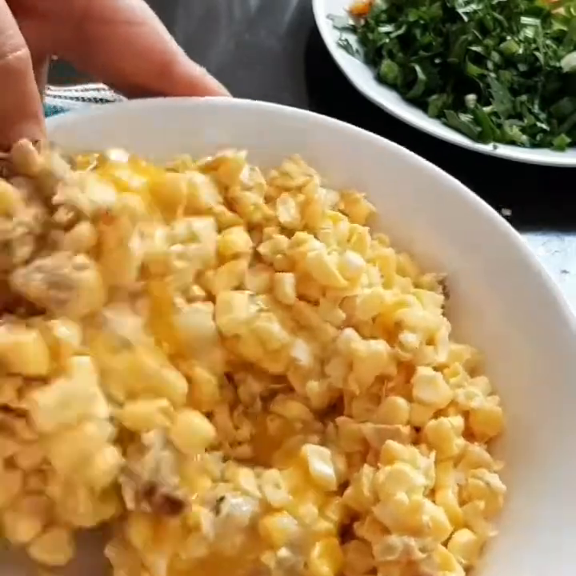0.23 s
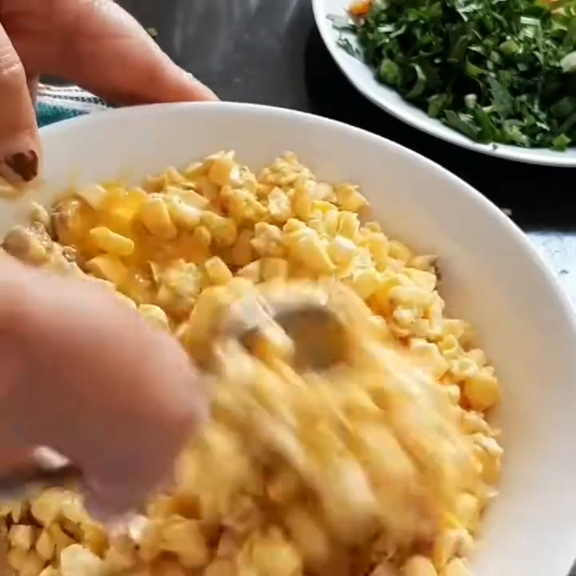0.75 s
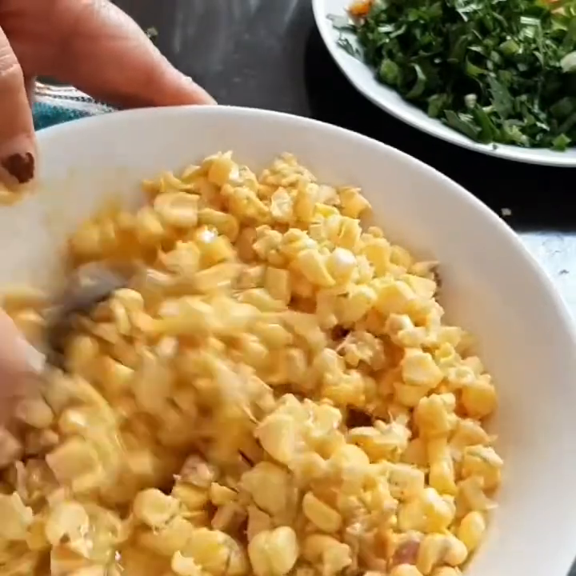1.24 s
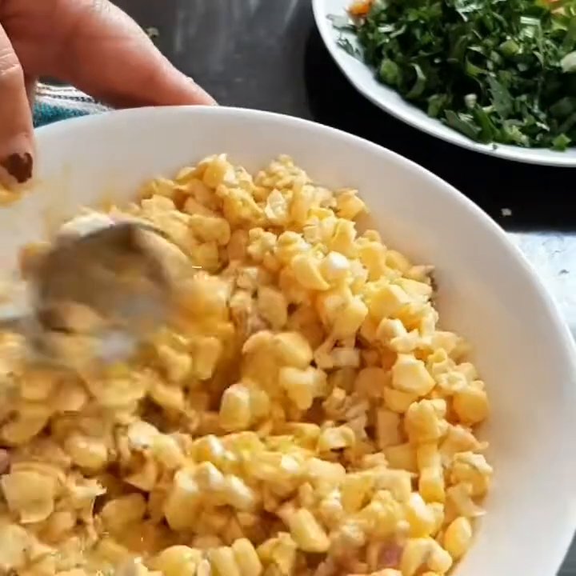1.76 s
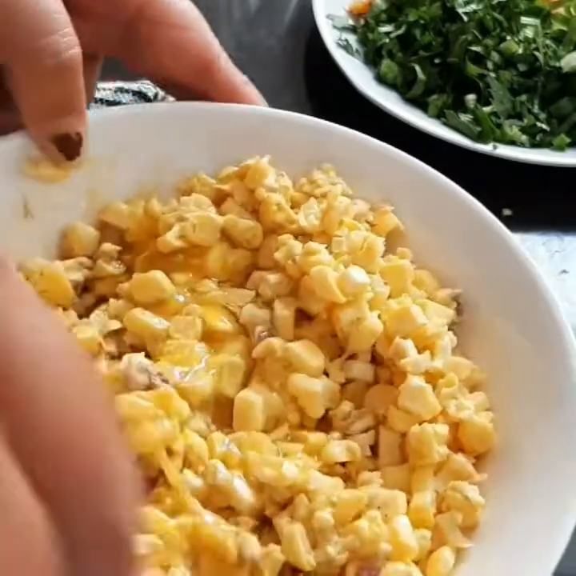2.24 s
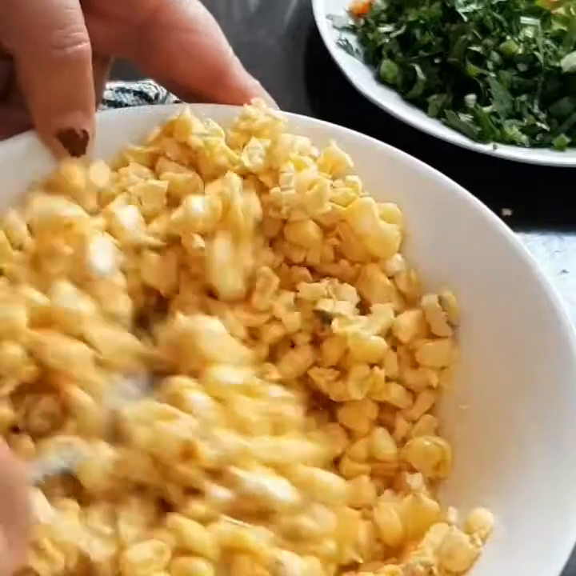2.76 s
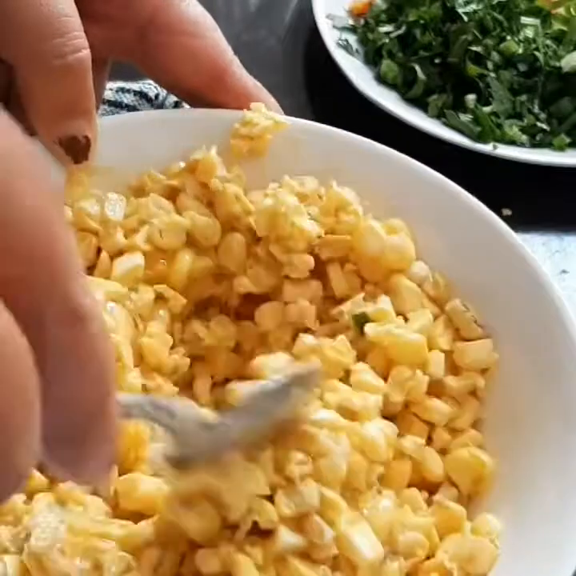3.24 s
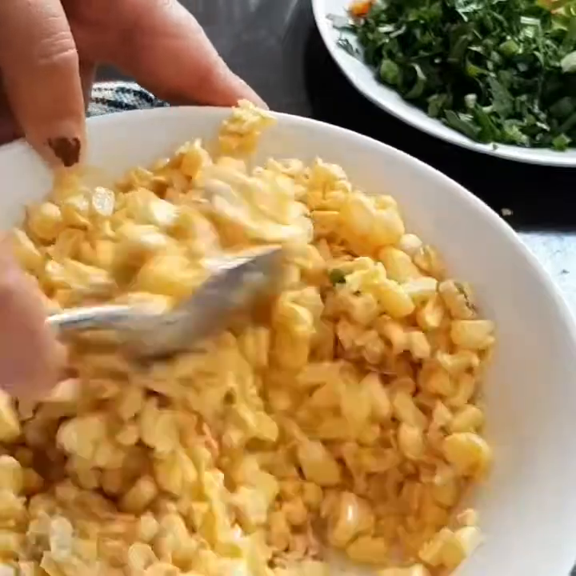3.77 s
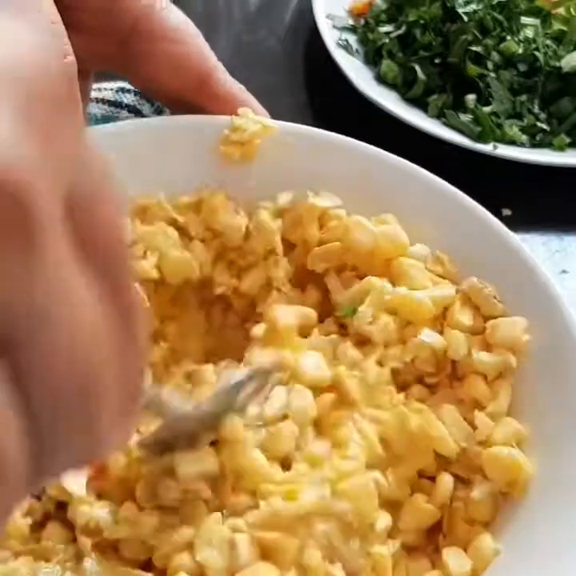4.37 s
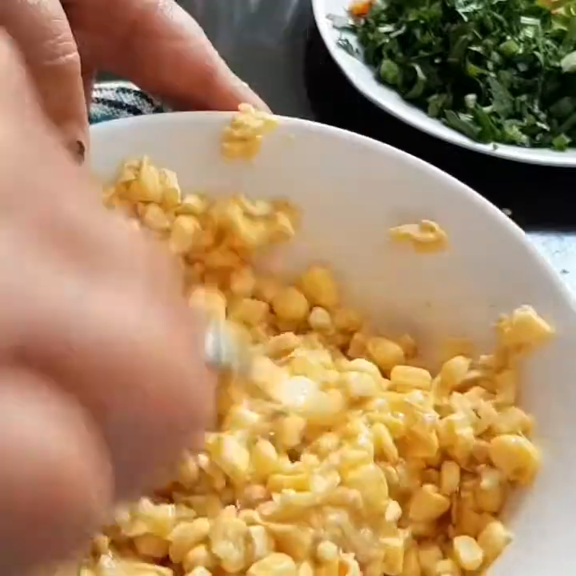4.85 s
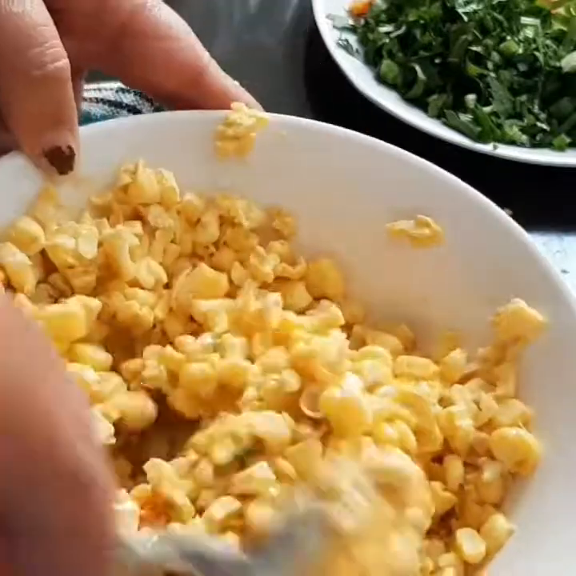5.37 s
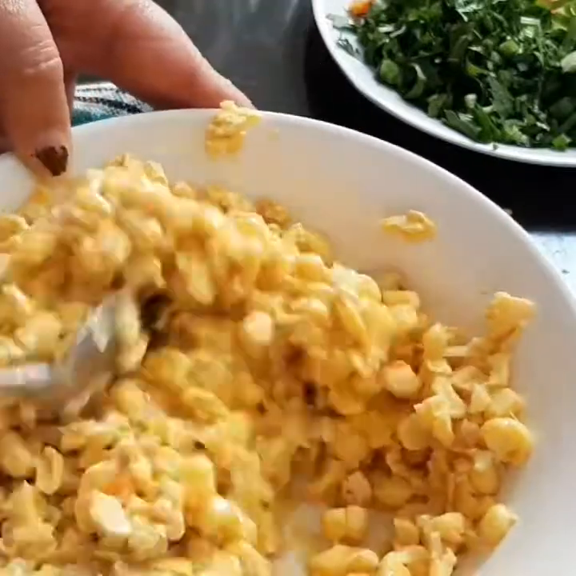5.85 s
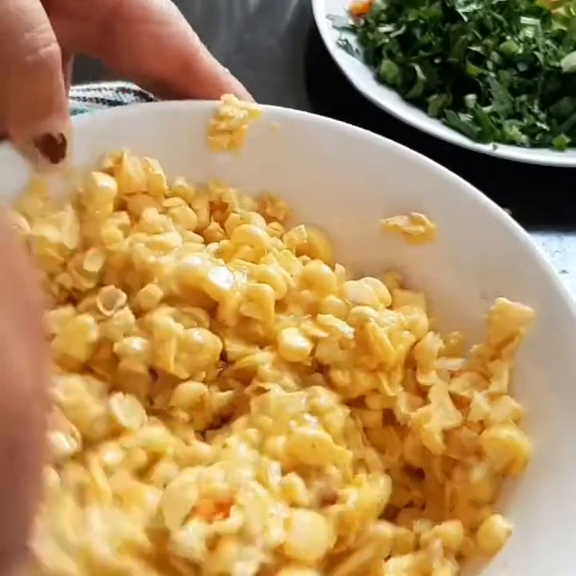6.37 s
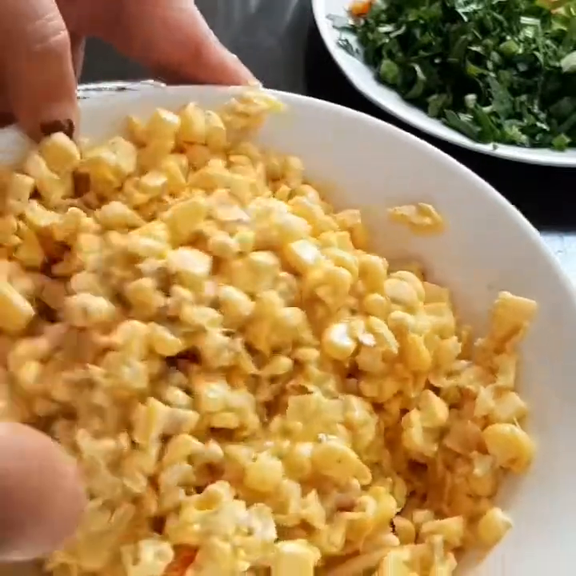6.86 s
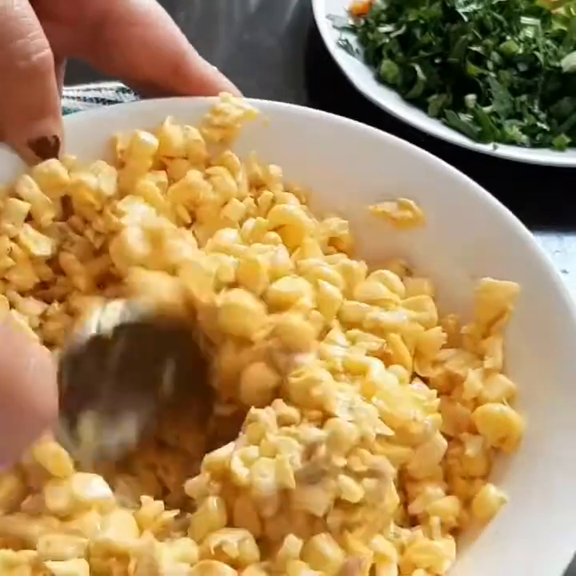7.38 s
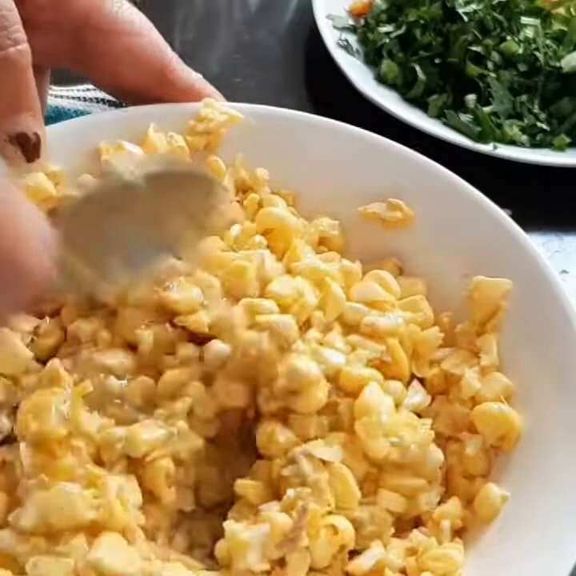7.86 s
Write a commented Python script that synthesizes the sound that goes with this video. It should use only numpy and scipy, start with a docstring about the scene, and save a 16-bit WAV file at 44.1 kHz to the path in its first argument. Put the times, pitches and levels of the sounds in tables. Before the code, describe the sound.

Close stereo pickup in a hard-walled kitchen: a metal spoon stirs wet, sticky corn in irregular squelching, crackling strokes. After an early clink come soft knocks, then a scrape and clink just before four seconds, a heavier cluster near four and a third, and the loudest clink around five and a half. A faint low appliance hum continues beneath. The sound fades away after six seconds and cuts back in with crackly stirring.

```python
"""In a hard-walled kitchen, a metal spoon stirs a wet corn mixture in a ceramic bowl, heard close by.
Each stroke sets off swarms of bursting bubbles (the squelch) and rings the hollow behind the spoon.
Filtered impulses make dull knocks through the food; damped modes and noise make clinks and scrapes on glaze.
Steady tones and coloured noise make an appliance's hum, and sparse decaying taps make the echo.
Near the end the sound fades out, and the stirring cuts in again."""
import sys
import numpy as np
from scipy import signal
from scipy.fft import rfft, irfft
from scipy.io import wavfile
from scipy.ndimage import uniform_filter1d

SR = 44100
rng = np.random.default_rng(int(sys.argv[2]) if len(sys.argv) > 2 else 0)


def generate_wav(signal):
    """Clip the signal to [-1, 1] and save it as 16-bit WAV at the path in sys.argv[1]."""
    frames = np.transpose(np.atleast_2d(signal))
    scaled = np.clip(frames, -1, 1) * 32767
    pcm = np.round(scaled).astype(np.int16)
    wavfile.write(sys.argv[1], SR, pcm)


N = 357645
TIME = np.arange(N) / SR  # s


def amp(db):
    """Level: converts decibels to an amplitude ratio."""
    return 10 ** (np.asarray(db) / 20)


def unit(x):
    """Normalisation: scales a signal to an rms of one."""
    return x / np.sqrt(np.mean(x ** 2) + 1e-20)


def read(points, hz):
    """Logarithmic pitch: interpolates a table along a log-frequency axis."""
    f, value = np.transpose(points)
    return np.interp(np.log(hz + 1), np.log(f), value)


def add(mix, s, sound):
    """Superposition: adds a sound to the mix in place, from time s."""
    part = mix[:, max(round(s * SR), 0):][:, :sound.shape[-1]]
    part += sound[..., :part.shape[1]]


def colour(x, points):
    """Spectral shaping: weights a signal by a spectrum table, at an rms of one."""
    gain = amp(read(points, np.fft.rfftfreq(N, 1 / SR)))
    return unit(irfft(rfft(x) * gain, N))


def drift(hz):
    """Low-pass noise: slow random variation up to about hz, with an rms of one."""
    f = np.fft.rfftfreq(N, 1 / SR)
    return unit(irfft(rfft(rng.standard_normal(N)) / (1 + (f / hz) ** 4), N))


def clicks(per_s, spread_db):
    """Poisson-like impulses: random snaps of either sign, most small and a few large."""
    size = amp(spread_db * np.minimum(rng.exponential(1, N), 4))
    sign = rng.choice([-1, 1], N)
    return size * sign * (rng.random(N) < per_s / SR)


def ring(hz, t60, t):
    """Damped oscillation: one mode that decays by 60 dB in t60 seconds."""
    return np.sin(2 * np.pi * hz * t) * np.exp(-np.log(1000) * t / t60)


def receivers(sound):
    """Arrival-time difference: each of two receivers hears a sound after its own few samples of lag."""
    lags = rng.integers(0, 12, 2)
    return np.array([np.pad(sound, (lag, 0))[:len(sound)] for lag in lags])


# left-right correlation of a diffuse sound: (f/Hz, correlation)
LEFT_RIGHT_CORRELATION = [(30, 0.42), (80, 0.79), (200, 0.75), (350, 0.69), (550, -0.24), (1000, -0.33),
                          (2000, -0.21), (16000, -0.1)]


def correlate_pair(z, hz):
    """Diffuse-field coherence: mixes two independent spectra until they are as alike as at two receivers."""
    same = np.clip(read(LEFT_RIGHT_CORRELATION, hz), -1, 1)
    return np.array([z[0], same * z[0] + np.sqrt(1 - same ** 2) * z[1]])


# tones of the appliance: (f/Hz, rms level/dB)
HUM_TONES = [(196, -56.5), (140.26, -77), (298, -81), (483.8, -85), (1450, -92.5), (3774, -98), (5389, -94)]
# spectrum of the room's soft rush: (f/Hz, relative level/dB per Hz)
KITCHEN_SPECTRUM = [(25, -20.5), (50, -5.5), (80, -2), (110, -3.5), (150, 3), (230, 0), (330, -4),
                    (500, -9.5), (800, -19.5), (1600, -20.5), (2600, -35.5), (5000, -27.5), (9000, -35),
                    (16000, -26.5)]
KITCHEN_DB = -66.5  # rms level of the rush


def appliance(waver_db=1.0):
    """Forced vibration: a motor's slightly unsteady tones over the soft rush of the room."""
    noise = rfft(rng.standard_normal((2, N)))
    air = irfft(correlate_pair(noise, np.fft.rfftfreq(N, 1 / SR)), N)
    # one wandering clock bends every tone in proportion to its pitch
    clock = TIME + .15 * drift(hz=2) / (2 * np.pi * HUM_TONES[0][0])
    tones = sum(amp(db) * np.sqrt(2) * np.sin(2 * np.pi * (hz * clock + rng.random()))
                for hz, db in HUM_TONES)
    return tones * amp(waver_db * drift(hz=8.5)) + amp(KITCHEN_DB) * colour(air, KITCHEN_SPECTRUM)


STROKE_DEPTH_DB = 25  # a stroke swells by this much over its rise and sinks by as much over its release


def push(peak_s, rise_s, release_s):
    """Exponential envelope: a stroke's force builds to the hardest push and lets go."""
    away = np.maximum((peak_s - TIME) / rise_s, (TIME - peak_s) / release_s)
    return amp(-STROKE_DEPTH_DB * away)


HOLLOW_Q, HOLLOW_RISE_OCTAVES_PER_S = 7.8, .5


def hollow(hz, peak_s):
    """Cavity resonance: bursting films ring the pocket behind the spoon; its pitch climbs as it closes."""
    pitch = hz * 2 ** (HOLLOW_RISE_OCTAVES_PER_S * np.clip(TIME - peak_s, -.5, .5))
    turn = np.exp(2j * np.pi * np.cumsum(pitch) / SR)
    r = np.exp(-np.pi * hz / HOLLOW_Q / SR)
    bursts = clicks(per_s=1500, spread_db=2.5) + 1e-12  # never exactly silent
    return unit((turn * signal.lfilter([1 - r], [1, -r], bursts)).real)


def bubble(hz, cycles):
    """Transient oscillation: a bursting film sounds a few cycles under an envelope that peaks at one."""
    turns = hz * np.arange(SR // 80) / SR
    u = turns / cycles
    return u * np.exp(1 - u) * np.sin(2 * np.pi * turns)


def grains(points, per_s, cycles, count=22):
    """Random superposition: bubbles burst in clumps; each size comes and goes, in its own place."""
    out = np.zeros((2, N))
    clumps = amp(2.8 * drift(hz=70))
    for hz in np.geomspace(350, 13500, count):
        grain = bubble(hz * rng.uniform(.94, 1.06), cycles) * hz
        share = amp(3 * np.interp(TIME, np.linspace(0, N / SR, 200), rng.standard_normal(200)))
        bursts = clumps * share * clicks(per_s / count, 3.5)
        out += receivers(signal.oaconvolve(bursts, grain)[:N])
    return colour(out, points)


# the lesser bubbles: rate, centre level against the crackle force, scatter either way, pitch range
SMALL_POPS_PER_S, SMALL_POP_DB, SMALL_POP_SPREAD_DB = 14, 12, 5
SMALL_POP_LOW_HZ, SMALL_POP_HIGH_HZ = 2025, 10000


def small_pops(crackle, count=300):
    """Poisson process: lesser bubbles burst at random, louder where the spoon works harder."""
    wait, size, pitch = rng.random((count, 3)).T
    s = np.cumsum(-np.log(1 - wait)) / SMALL_POPS_PER_S
    db = 20 * np.log10(np.interp(s, TIME, crackle)) + SMALL_POP_DB + SMALL_POP_SPREAD_DB * (2 * size - 1)
    hz = SMALL_POP_LOW_HZ * (SMALL_POP_HIGH_HZ / SMALL_POP_LOW_HZ) ** pitch
    return [row for row in zip(s, db, hz) if row[0] < TIME[-1]]


# strokes of the spoon through the food: (t/s of the hardest push, rise t/s, release t/s,
# relative crackle level/dB, relative squelch level/dB, hollow f/Hz)
SPOON_STROKES = [(0.478, 0.13, .07, -63.5, -68, 2720), (0.78, 0.062, 0.088, -56.5, -56, 2000),
                 (1.1, 0.095, 0.12, -71.5, -65, 1570), (1.5, 0.16, 0.37, -63, -76, 3540),
                 (1.952, 0.055, .07, -64, -61.5, 2050), (2.279, 0.05, 0.13, -61, -64, 2680),
                 (2.48, 0.049, 0.17, -54, -57, 2410), (2.762, 0.26, 0.1, -62.5, -76, 3020),
                 (3.099, 0.18, 0.11, -63.5, -67.5, 1590), (3.43, 0.11, .14, -63.5, -64.5, 2260),
                 (4.34, 0.15, 0.58, -70.5, -62.5, 2700), (4.7, 0.11, 0.18, -60, -63.5, 4320),
                 (5.082, 0.14, 0.28, -65, -62.5, 2133), (6.47, 0.23, 0.11, -64, -68, 3467),
                 (6.78, 0.085, 0.04, -56.5, -55, 3200), (7.33, 0.16, .08, -59, -66, 4253),
                 (7.57, 0.051, 0.24, -62, -86, 6930), (7.87, 0.46, 0.22, -66, -85, 3700),
                 (8.1, 0.22, 0.11, -55, -81, 6500)]
# the largest sticky bubbles that burst: (t/s, relative level/dB, f/Hz)
LARGE_POPS = [(0.761, -45.5, 3100), (1.531, -38, 7100), (1.93, -48, 2230), (1.961, -42, 2030),
              (2.631, -41.5, 2080), (4.529, -41.5, 11500), (4.686, -35, 4490), (5.179, -45.5, 4930),
              (6.797, -43, 8270), (7.565, -42, 6900), (7.599, -38, 10100), (7.825, -38.5, 3820)]
# spectra of the fine crackle and the low squelch: (f/Hz, relative level/dB per Hz)
CRACKLE_SPECTRUM = [(1500, -33), (3000, 1.5), (4000, 5), (6500, 4.5), (9500, -4.5), (13000, 4),
                    (16000, -10)]
SQUELCH_SPECTRUM = [(200, -1), (450, 2.5), (900, -2.5), (1500, 4), (2000, 5.5), (2400, -4.5), (3500, -15.5),
                    (6000, -18), (12000, -35.5)]
SETTLE_CRACKLE_DB, SETTLE_SQUELCH_DB = -86.5, -94.5  # the food settling, on the strokes' scale
HOLLOW_DB = -11  # the hollow's ring against the stroke


def food(crackle_db=-3, squelch_db=1, pops_db=3, snap_db=-9, snap_s=0.0011):
    """Bubble acoustics: parting kernels crackle; larger air pockets squelch and ring; films snap."""
    crackle, squelch = amp(SETTLE_CRACKLE_DB), amp(SETTLE_SQUELCH_DB)
    out = np.zeros((2, N))
    for s, rise_s, release_s, wet_db, low_db, hz in SPOON_STROKES:
        force = push(s, rise_s, release_s)
        crackle = crackle + amp(wet_db) * force
        squelch = squelch + amp(low_db) * force
        out += amp(HOLLOW_DB) * (amp(wet_db) + amp(low_db)) * force * receivers(hollow(hz, s))
    out += amp(crackle_db) * crackle * grains(CRACKLE_SPECTRUM, per_s=7000, cycles=0.7)
    out += amp(squelch_db) * squelch * grains(SQUELCH_SPECTRUM, per_s=4100, cycles=1)
    t = np.arange(SR // 80) / SR
    for s, db, hz in LARGE_POPS + small_pops(crackle):
        snap = amp(snap_db) * rng.standard_normal(len(t)) * np.exp(-t / snap_s)
        pop = bubble(hz, cycles=1.1) / 2 + snap
        add(out, s - snap_s / 2, amp(db + pops_db) * receivers(pop))
    return out


# modes of the full, hand-held bowl with the spoon against it: (f/Hz, relative level/dB, t60/s)
BOWL_MODES = [(304.8, -10, 0.012), (718.3, 6.5, 0.022), (1090, -14.5, 0.0025), (1533, -0.5, 0.021),
              (1533, 7.5, 0.031), (1770, -11, 0.02), (2282, -2.5, 0.013), (2540, -21, 0.11),
              (3434, -1, 0.01), (3857, 2.5, 0.016), (4700, -16.5, 0.037), (5700, -10, 0.0096),
              (6600, -15, 0.01), (7200, -11, 0.014), (8700, -16, 0.0091), (11100, -11.5, 0.014)]
CONTACT_S = .00004  # time constant with which a strike sets the wall moving


def bowl(t, favoured_hz, favour_db, octaves=0.25):
    """Modal superposition: the place struck favours modes near one pitch; the ring has a peak of one."""
    def near(hz):
        """Modal weighting: a bell curve over log frequency, one at the favoured pitch."""
        return np.exp(-.5 * (np.log2(hz / favoured_hz) / octaves) ** 2)

    out = sum(amp(db + favour_db * near(hz)) * ring(hz, t60, t) / hz for hz, db, t60 in BOWL_MODES)
    out = np.diff(out, prepend=0)  # the air follows the wall's speed, not its position
    out *= 1 - np.exp(-t / CONTACT_S)
    return out / abs(out).max()


SCRAPE_ATTACK_SHARE, SCRAPE_RELEASE_S = 0.58, .006  # pressure builds over this share of a scrape's length


def drag(start_s, length_s):
    """Contact force: the spoon's edge bites, holds and lifts off."""
    t = TIME - start_s
    bite = np.clip(t / (SCRAPE_ATTACK_SHARE * length_s), 0, 1)
    return bite * np.exp(-np.maximum(t - length_s, 0) / SCRAPE_RELEASE_S)


# spectrum of metal on bare glaze: (f/Hz, relative level/dB per Hz)
GRIT_SPECTRUM = [(100, -25), (300, -5), (700, -5.5), (1500, 0.5), (3000, -1.5), (4200, -0.5), (5200, -6),
                 (7800, -6), (9500, -14.5), (11500, -10), (16000, -16.5)]
# the spoon's edge dragged on the glaze, and two short squelch bursts of the food at 1.93 and 4.72 s made the
# same way: (start t/s, length t/s, level/dB, # bare grit relative level/dB: lower where sauce coats the glaze)
GLAZE_SCRAPES = [(-0.005, 0.1, -53.5, -1.5), (1.927, 0.003, -63, 7), (2.455, 0.02, -52.5, 4),
                 (3.784, 0.051, -44.5, 2.5), (3.823, 0.096, -46.5, 4), (4.719, 0.0055, -47.5, -5),
                 (5.411, .011, -46, 1), (5.438, .035, -49.5, 3.5), (5.505, .27, -46.5, -6.5),
                 (5.79, 0.086, -49, -0.5), (5.919, 0.025, -52, 0)]


def scrapes(ring_db=-6):
    """Stick-slip friction: the edge slips in dense snaps, heard bare and through the bowl's modes."""
    grip = amp(3 * drift(hz=120))
    slips = grip * np.array([clicks(per_s=5000, spread_db=3.3) for side in "LR"])
    body = bowl(np.arange(SR // 10) / SR, favoured_hz=4000, favour_db=0.5)
    rung = amp(ring_db) * unit(signal.oaconvolve(slips.sum(0), body)[:N])
    grit = colour(slips, GRIT_SPECTRUM)
    return sum(amp(db) * drag(s, length_s) * (rung + amp(grit_db) * grit)
               for s, length_s, db, grit_db in GLAZE_SCRAPES)


# metal on bare glaze: (t/s, ring peak level/dB, favoured f/Hz of the place struck, favour level/dB,
# crack relative level/dB, top f/Hz of the crack, left receiver's lag t/s)
GLAZE_CLINKS = [(0.075, -16.5, 961, 59.5, 4.5, 4670, 0), (3.772, -14, 720, 5.5, 7.5, 15050, 0),
                (4.333, -25, 2723, 25, 3.5, 6000, 0.0011), (5.4449, -30, 3700, 5, -3, 12000, 0.0013),
                (5.5745, -3.5, 1987, 22.5, -12.5, 6500, 0.00013)]


def clinks(crack_s=.0018, crack_db=-8, rattle_db=-19, rattle_s=0.01):
    """Impact excitation: metal chatters and rings the bowl; a faint rattle outlasts the crack."""
    out, t = np.zeros((2, N)), np.arange(SR // 8) / SR
    chatter = colour(rng.standard_normal((2, N)), GRIT_SPECTRUM)
    decay = np.exp(-t / crack_s) + amp(rattle_db) * np.exp(-t / rattle_s)
    for s, db, hz, favour_db, hard_db, top_hz, lag_s in GLAZE_CLINKS:
        crack = chatter[:, round(s * SR):][:, :len(t)] * decay
        crack = signal.lfilter(*signal.butter(2, min(top_hz, SR / 2 - 1), fs=SR), crack)
        strike = amp(db) * (bowl(t, hz, favour_db) + amp(hard_db + crack_db) * crack)
        add(out[:1], s + lag_s, strike[:1])
        add(out[1:], s, strike[1:])
    return out


# the bowl pushed down on the counter: (t/s, bowl's level/dB before its soft onset)
COUNTER_THUMPS = [(0.075, -38.5), (1.095, -42.5), (2.267, -45.5), (3.769, -21), (4.332, -25.5),
                  (5.417, -33), (5.575, -27)]


def thumps(counter_db=-52):
    """Mass on a spring: a push sets the bowl bouncing; the counter answers lower, at one fixed level."""
    out, t = np.zeros((2, N)), np.arange(SR // 8) / SR
    for s, db in COUNTER_THUMPS:
        swing = amp(db) * ring(hz=278, t60=0.056, t=t)
        swing = swing - amp(counter_db) * ring(hz=77.6, t60=.07, t=t)
        add(out, s, swing * (1 - np.exp(-t / .0022)))
    return out


# spectrum of a cushioned blow: (f/Hz, relative level/dB per Hz)
KNOCK_SPECTRUM = [(100, -22), (280, -2.5), (400, 4), (550, -1), (720, 2.5), (1100, -5.5), (1550, -6.5),
                  (1950, -13), (2400, -22.5), (4200, -28.5), (6000, -32.5), (14000, -48)]
# blows on the bowl cushioned by food: (t/s, peak level/dB, hardness as a tilt/dB per octave)
CUSHIONED_KNOCKS = [(0.57, -50, -2), (0.633, -50, -8), (0.9858, -48, -2.5), (2.083, -33.5, 3),
                    (2.27, -35, 4), (2.379, -25.5, 3.5), (2.4703, -30.5, 1.5), (2.9923, -41.5, 0.5),
                    (3.2712, -36, 1), (3.3735, -40.5, 2.5), (3.48, -37, 0), (3.9935, -24, 4),
                    (4.2577, -41, 4.5), (4.31, -24, 4), (4.3339, -13, 0), (4.427, -24, 3.5),
                    (4.593, -44, -5), (4.9625, -44, -3.5), (5.0889, -36, -3.5), (5.27, -41, -4),
                    (5.4154, -27, 2.5), (5.4199, -18.5, 0), (6.0432, -44, -2), (6.0557, -36.5, -5.5),
                    (6.0678, -41.5, 4), (6.1751, -25, 2.5), (6.6782, -43, -6), (6.938, -49.5, -6.5),
                    (7.159, -42.5, -5)]


def knocks(gain_db=0, lead_s=.0007, size=2048):
    """Minimum-phase impulse: a cushioned blow is one short push and rebound, brighter in thin food."""
    out, hz = np.zeros((2, N)), abs(np.fft.fftfreq(size, 1 / SR))
    octaves = np.log2(np.clip(hz, 200, 2500))
    for s, db, tilt in CUSHIONED_KNOCKS:
        log_gain = np.log(amp(read(KNOCK_SPECTRUM, hz) + tilt * octaves))
        # causal: the impulse has nothing ahead of its own start
        blow = np.fft.ifft(np.exp(np.conj(signal.hilbert(log_gain)))).real
        add(out, s - lead_s, amp(db + gain_db) * receivers(blow / abs(blow).max()))
    return out


# the kitchen's reverberation time: (f/Hz, t60/s)
REVERBERATION_TIME = [(150, .45), (500, 0.47), (1500, 0.67), (4000, 0.67), (8000, 0.5), (15000, 0.84)]
# the kitchen's echo against the direct sound: (f/Hz, level/dB)
REVERBERATION_LEVEL = [(100, 1.5), (300, 2), (1000, 0), (2500, -5), (6000, -3), (15000, -8)]


def room(x, first_s=0.0019, early=0.59, early_s=0.051):
    """Reverberation: scattered reflections, strongest from near surfaces, die at each band's own speed."""
    t = np.arange(SR) / SR
    sparse = rng.standard_normal((2, SR)) * (rng.random((2, SR)) < 1 / 8)
    taps = sparse * (t > first_s) * (1 + early * np.exp(-t / early_s))
    hz, t, z = signal.stft(taps, SR, nperseg=256)
    z = correlate_pair(z, hz[:, None]) * amp(-60 * t / read(REVERBERATION_TIME, hz)[:, None])
    # even out the energy of the bands before giving each its level
    energy = uniform_filter1d((abs(z) ** 2).sum(2), 3, axis=1)[:, :, None]
    even = z / np.sqrt(energy)
    flat = signal.istft(even, SR, nperseg=256)[1]
    tail = signal.istft(even * amp(read(REVERBERATION_LEVEL, hz))[:, None], SR, nperseg=256)[1]
    return signal.fftconvolve(x, tail / np.linalg.norm(flat[0]), axes=1)[:, :N]


def scene(left_db=.5, lowest_hz=70):
    """Direct and reverberant fields: spoon, food and bowl, a little to the left, with echo and hum."""
    near = food() + knocks() + thumps() + clinks() + scrapes()
    near = near * amp([[left_db], [-left_db]])
    # the near sounds carry no deep bass
    near = signal.sosfilt(signal.butter(2, lowest_hz, "high", fs=SR, output="sos"), near)
    return near + room(near) + appliance()


FADE_START_S, FADE_END_S, FADE_POWER = 6.1, 7.54, 1.3  # the power bends the fade's curve
RETURN_S, RETURN_DB, RECOVER_DB_PER_S = 7.562, -6.5, 7


def fader():
    """Amplitude envelope: the sound fades to silence, then cuts back in a little low and recovers."""
    remaining = np.clip((FADE_END_S - TIME) / (FADE_END_S - FADE_START_S), 0, 1)
    back = amp(np.minimum(RETURN_DB + RECOVER_DB_PER_S * (TIME - RETURN_S), 0))
    return np.where(TIME < RETURN_S, remaining ** FADE_POWER, back)


EDGE_HZ = 15950  # top of the band


def record(dry):
    """Band limitation: applies the fader, then a steep linear-phase low-pass."""
    low_pass = signal.firwin(511, EDGE_HZ, window=("kaiser", 9), fs=SR)
    return signal.oaconvolve(dry * fader(), low_pass[None], "same")


dry = scene()
out = record(dry)
generate_wav(out)
```